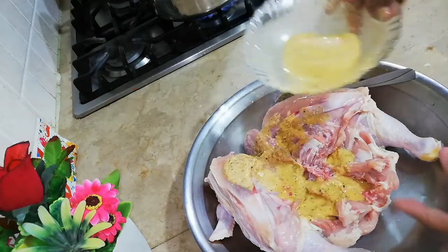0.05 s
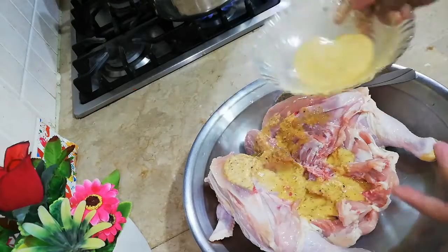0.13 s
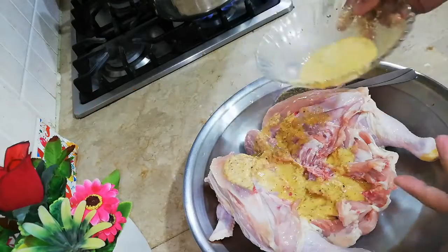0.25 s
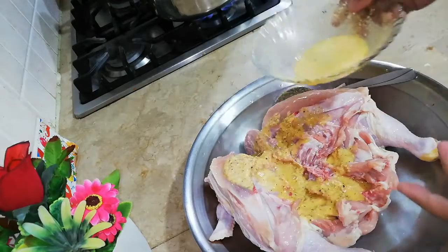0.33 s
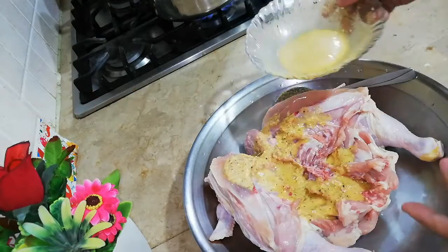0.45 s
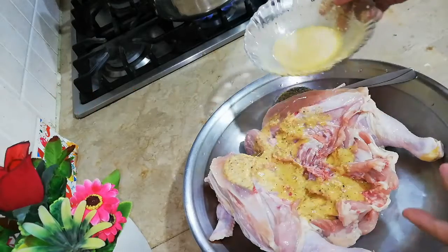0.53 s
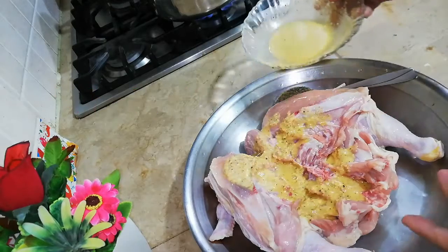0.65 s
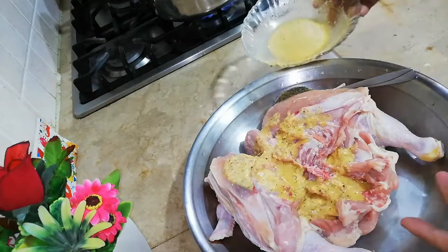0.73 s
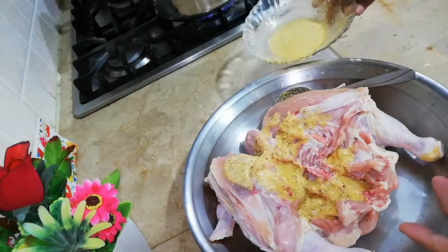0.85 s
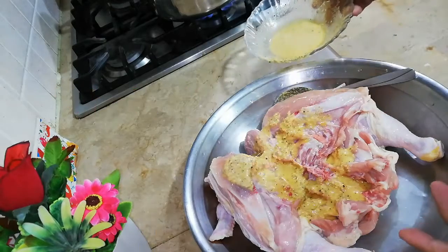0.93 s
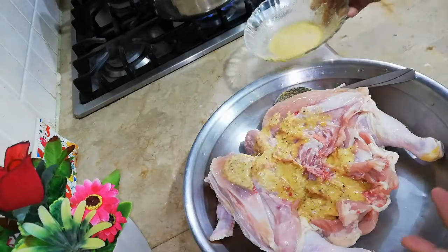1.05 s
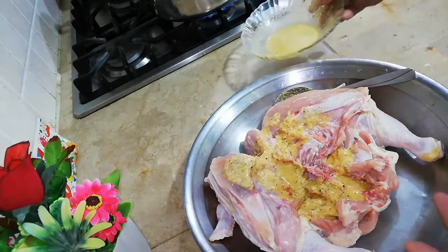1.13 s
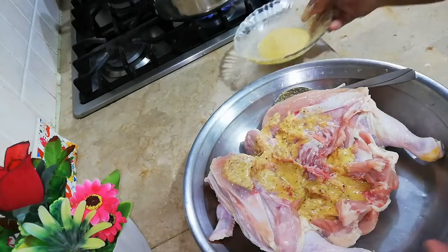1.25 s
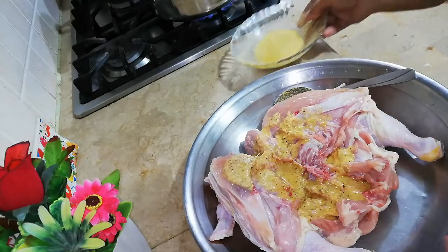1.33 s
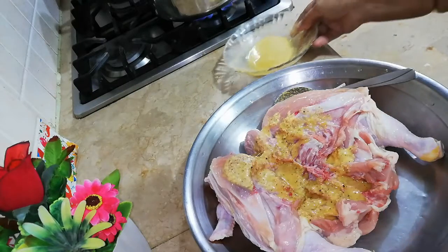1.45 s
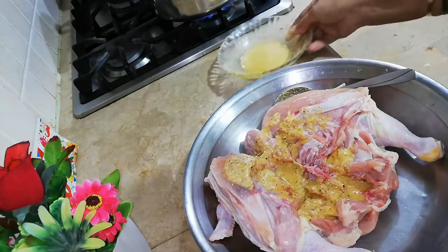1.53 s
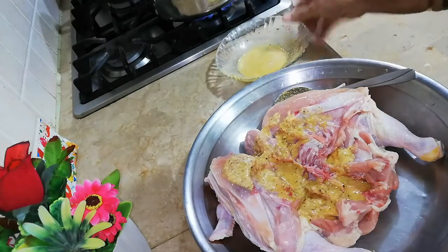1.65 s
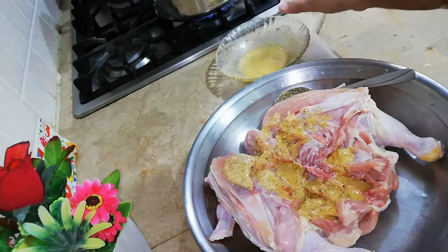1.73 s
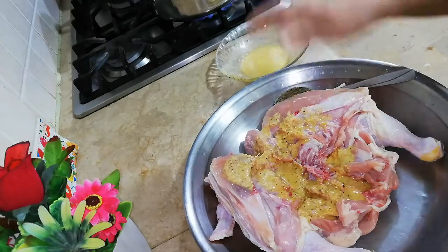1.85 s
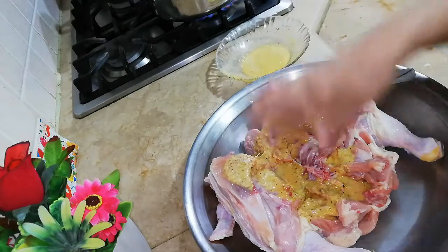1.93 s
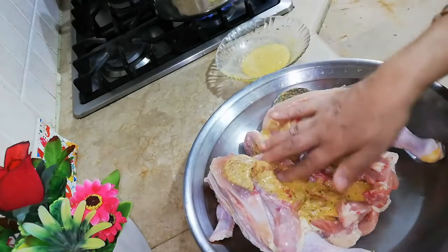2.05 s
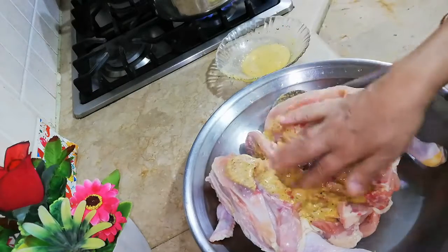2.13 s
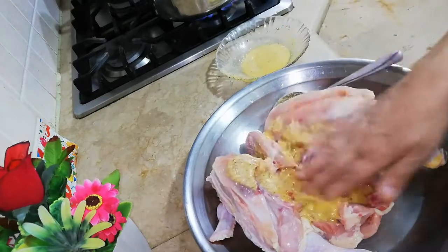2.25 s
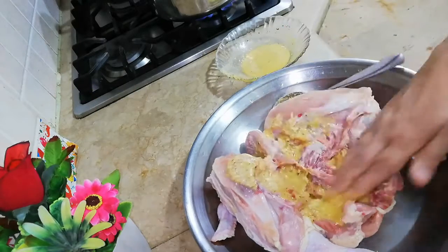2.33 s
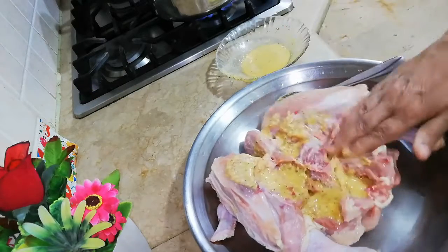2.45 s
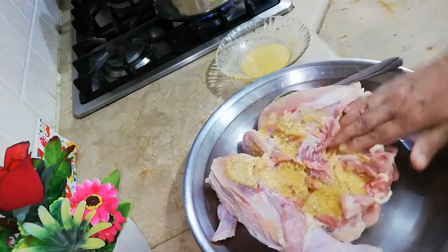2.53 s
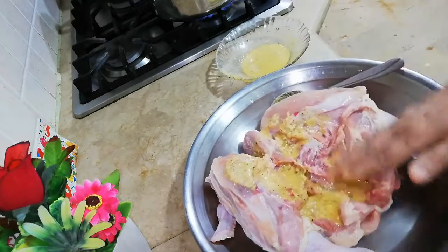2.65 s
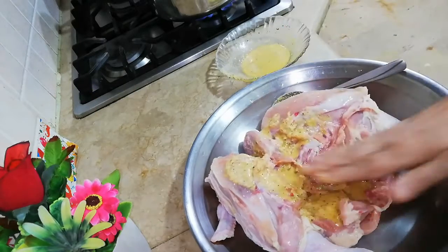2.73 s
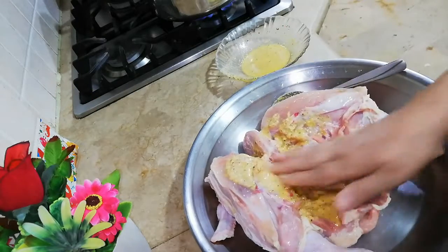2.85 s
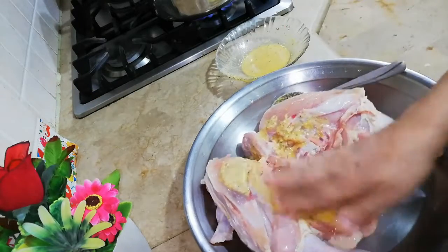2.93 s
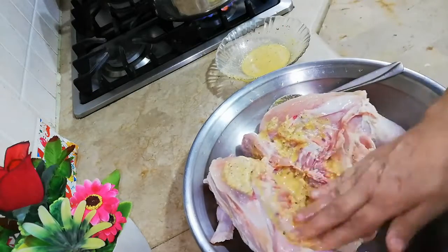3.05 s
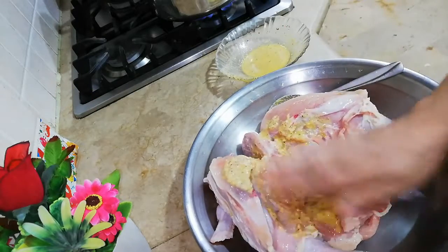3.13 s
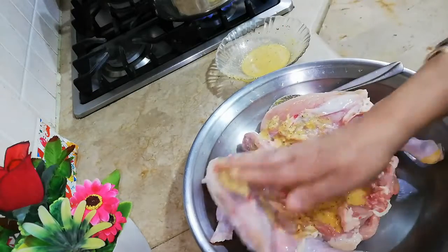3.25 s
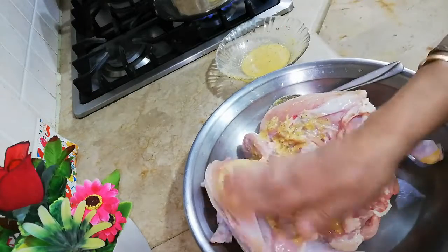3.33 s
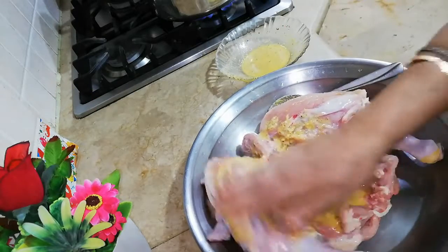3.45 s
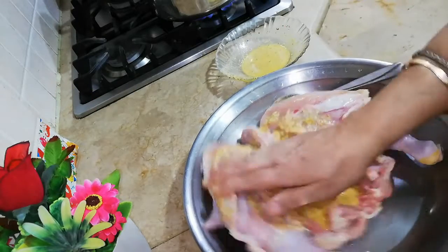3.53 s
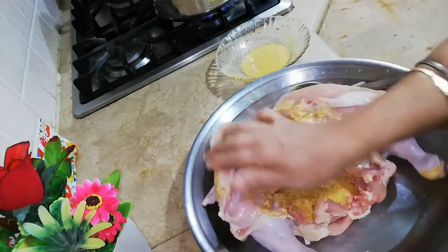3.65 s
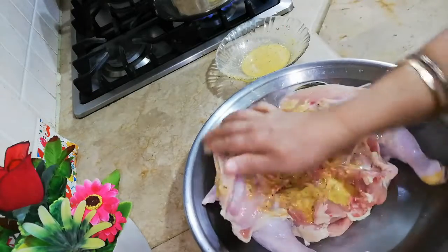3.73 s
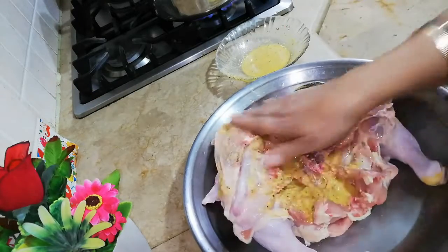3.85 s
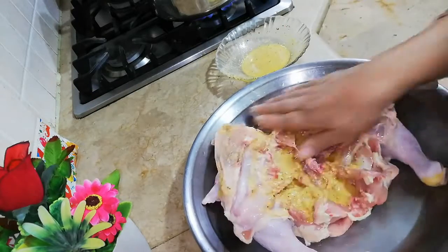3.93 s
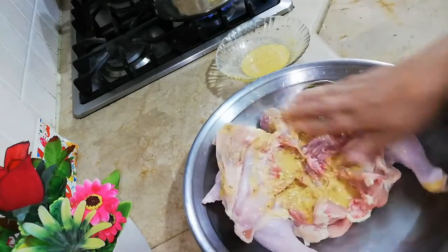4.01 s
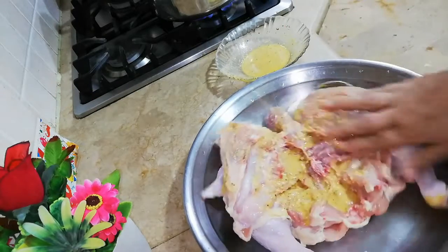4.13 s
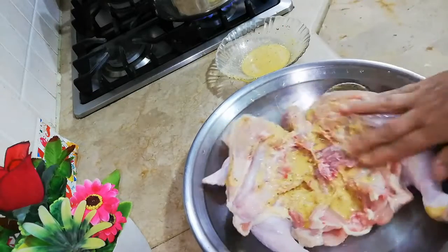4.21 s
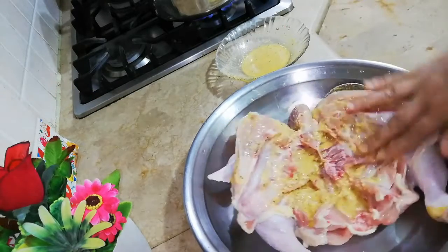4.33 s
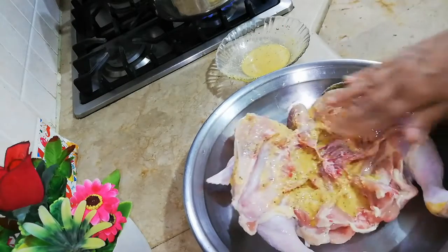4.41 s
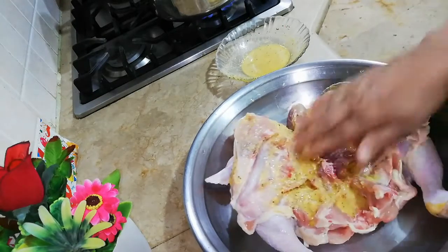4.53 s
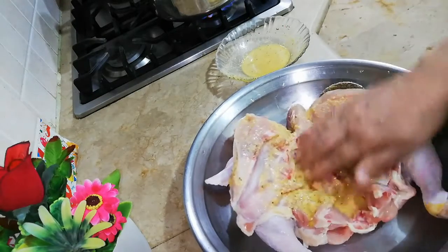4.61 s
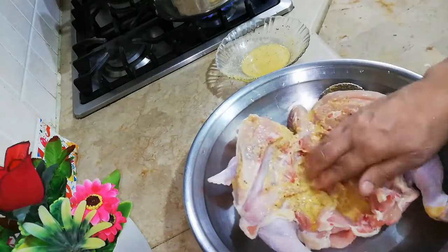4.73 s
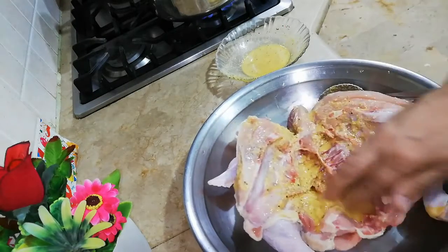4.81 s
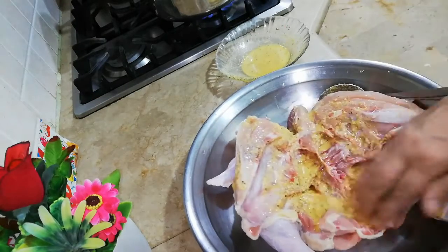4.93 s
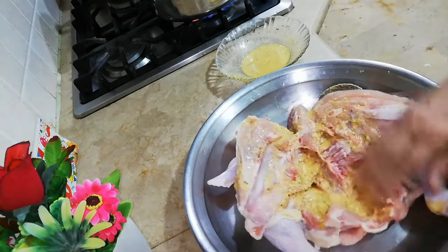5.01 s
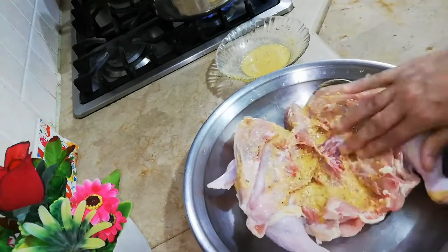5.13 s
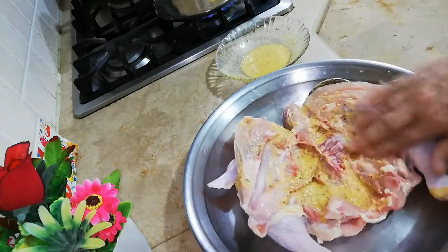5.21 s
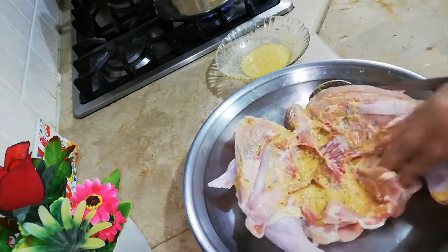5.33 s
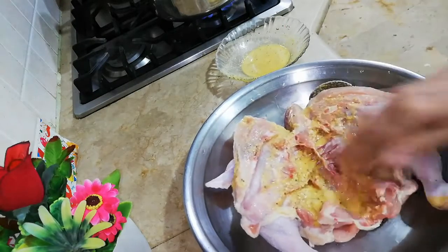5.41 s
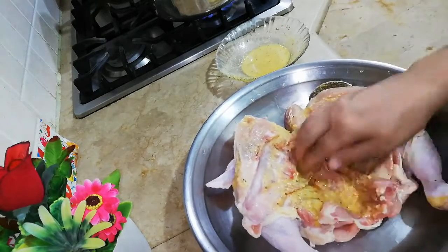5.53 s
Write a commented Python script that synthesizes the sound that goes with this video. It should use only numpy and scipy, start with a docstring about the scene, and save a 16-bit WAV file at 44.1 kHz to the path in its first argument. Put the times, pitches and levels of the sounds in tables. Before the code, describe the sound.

Over a low motor hum, a glass bowl is set down, then raw chicken is rubbed with wet smacks in a scraping metal tray.

```python
"""A small tiled kitchen with a humming motor. A glass bowl rocks down onto the stone counter in three
main knocks. A hand lands on raw chicken in a steel tray, which tips and clacks on the stone. As marinade
is rubbed in, the tray scrapes round in short strokes: tiny slips ring its floor, wall and rim, and the
hand bends the floor's pitch. Wet films smack, bubbles burst and air squelches out of the meat."""
import sys
import numpy as np
from scipy import signal
from scipy.fft import rfft, irfft, next_fast_len
from scipy.io import wavfile
from scipy.ndimage import uniform_filter1d

SR = 44100
rng = np.random.default_rng(int(sys.argv[2]) if len(sys.argv) > 2 else 0)


def unload_audio(sound):
    """Save the sound as a 16-bit wav file, at the path given as the first command line argument."""
    columns = np.transpose(np.atleast_2d(sound))
    # keep every value between -1 and 1, then stretch to whole-number steps
    steps = np.round(np.clip(columns, -1, 1) * 32767)
    wavfile.write(sys.argv[1], SR, steps.astype(np.int16))


N = 245637
TIME_S = np.arange(N) / SR
GRID_HZ = np.maximum(np.fft.rfftfreq(16384, 1 / SR), 1)

# Diffuse room sound. Each row: frequency in Hz, left-right correlation.
STEREO_CORRELATION = [(60, 0.96), (140, 1), (290, 0.63), (640, -0.57), (1400, 0.3), (3000, 0)]
# Room decay. Each row: frequency in Hz, T60 in seconds.
ROOM_T60 = [(100, 0.53), (400, 0.75), (1400, 0.53), (4000, 0.45), (12000, 0.32)]
# Motor and mains hum. Each row: frequency in Hz, rms level in dB.
HUM_TONES = [(48.5, -53.5), (97, -63.5), (100.5, -59), (145.4, -64), (290.7, -69)]
# Room noise spectrum. Each row: frequency in Hz, relative density in dB.
HISS_SPECTRUM = [(25, -6.5), (60, -0.5), (110, 1), (180, -1), (240, -9.5), (310, -4.5), (450, -11.5),
                 (850, -13), (1350, -15), (2000, -14.5), (5500, -20.5), (11200, -19.5), (12300, -30.5),
                 (16000, -28.5)]
# Faint whines in the room noise. Each row: frequency in Hz, width in Hz, relative level in dB.
WHINES = [(854, 115, 2.5), (1051, 34, 5), (1972, 64, 4.5), (2900, 480, -13), (3800, 105, 1.5),
          (7100, 68, -0.5), (11040, 220, -8.5)]

# Modes of the bowl on stone, its upper glass range, the counter and the steel tray.
# Each row: frequency in Hz, width in Hz, relative level in dB.
BOWL_MODES = [(797, 114, -6.5), (1217, 120, -3), (1520, 190, -7), (1770, 83, -8.5), (1950, 120, -9),
              (2350, 120, -11), (2660, 120, -13.5), (2760, 220, -17.5)]
GLASS_MODES = [(3210, 240, 9), (4380, 540, 0), (5220, 580, 2.5), (7900, 600, -7.5), (8800, 180, -3),
               (9900, 480, 0), (12800, 4700, -13)]
COUNTER_MODES = [(102, 4.4, 5), (113.4, 5.5, 2), (167.8, 7.1, 9), (200.4, 14.4, 1.5), (293, 18, 1.5),
                 (309, 30, -1), (353.7, 14.5, 3), (572, 140, -4.5)]
TRAY_MODES = [(836, 90, -1.5), (1280, 42, 3.5), (1368, 27, 6.5), (1588, 59, 11.5), (1820, 49, 7),
              (1960, 160, -19), (2153, 27, 9.5), (2473, 68, 2.5), (3190, 29, 5.5), (3390, 64, 3),
              (3630, 62, 5.5), (3970, 29, 7.5), (4310, 45, 3), (4514, 71, 6.5), (4843, 95, 4.5),
              (5160, 49, 3), (6230, 160, -12.5), (6660, 44, -6), (7080, 39, -3), (7560, 43, -4),
              (8070, 160, -8.5), (8650, 140, -7.5), (9300, 64, -7), (9870, 150, -17.5), (10910, 46, -8.5),
              (11500, 270, -16.5), (12300, 110, -16), (13800, 1800, -29.5)]
# Bowl knocks. Each row: start in seconds, delay until the foot seats in seconds, level in dB,
# clink offset in dB, clink emphasis in Hz, thud offset in dB.
KNOCKS = [(1.459, 0.001684, -5, -8.5, 5500, -16.5), (1.53, .0008, -8.5, -9.5, 4970, -16),
          (1.5486, 0.00138, -18, -21, 5000, -36), (1.6246, 0.00138, -8, -5, 8200, -15.5),
          (1.77, 0.00166, -27.5, -38, 5400, -48)]

# Meat under the palm. Each row: peak time in seconds, level in dB, pitch in Hz, half-length in seconds.
SQUELCHES = [(2.536, -49, 1130, 0.047), (2.705, -59, 520, 0.036), (3.637, -53, 490, 0.035),
             (4.106, -44, 860, 0.027), (4.39, -62, 610, 0.12), (5.52, -53.5, 720, 0.06),
             (5.537, -53, 573, 0.071)]
# Wet smacks. Each row: start in seconds, level in dB, centre in Hz, width in Hz.
SMACKS = [(2.055, -25, 10300, 3960), (2.07, -28, 7000, 4000), (2.0797, -21, 8800, 4000),
          (2.197, -29, 4480, 1500), (2.633, -28.5, 2900, 495), (2.9993, -17.5, 5200, 3450),
          (3.291, -27.5, 7850, 6000), (3.536, -35.5, 2200, 500), (3.5517, -21, 4540, 1500),
          (3.572, -27, 1270, 500), (4.577, -28, 7550, 4000), (4.6462, -27, 4780, 1500),
          (4.789, -27, 4940, 3540), (4.8415, -27.5, 10800, 5000), (5.12, -11.5, 10100, 1200),
          (5.345, -22, 3380, 800)]

# Tray hits on the counter. Each row: start in seconds, level in dB.
CLACKS = [(2.2208, -14), (2.2226, -6.5), (2.2257, -9), (2.2294, -13), (2.252, -24)]
# Mode weighting for a hard blow at the tray's edge. Each row: frequency in Hz, gain in dB.
EDGE_BLOW_EQ = [(400, 6.5), (870, -11.5), (1400, -7), (1900, -15), (2450, -4.5), (2800, -13), (3160, 5.5),
                (3750, -6.5), (4300, 5.5), (4700, -10), (5400, 2), (8000, 6), (15000, 4.5)]
# Hand pushes on the tray. Each row: start, rise and hold in seconds, level in dB,
# rim offset in dB, floor offset in dB.
PUSHES = [(1.927, .02, .08, -59, -4, -4), (2.273, .12, .025, -42, -6.5, -5),
          (2.45, 0.025, .02, -57, -4, -10), (2.499, 0.029, .02, -43, -4.5, -1.5),
          (2.564, 0.021, .01, -48, -4, -.5), (2.636, .045, .04, -41, -8, -1.5),
          (2.95, 0.056, .006, -41.5, -1.5, -6.5), (3.034, 0.035, .006, -41, -3, -4.5),
          (3.379, 0.029, 0.013, -49, -6, -2), (3.554, 0.084, .03, -35.5, 4, -5.5),
          (3.667, 0.027, 0.067, -40.5, 2.5, -2.5), (3.962, 0.046, .14, -42, -4.5, -3.5),
          (4.116, 0.023, 0.057, -38.5, -1, -3), (4.195, 0.022, 0.063, -43, -2, -1.5),
          (4.273, 0.023, .02, -36.5, -1.5, -3), (4.305, 0.022, .006, -35.5, 4, -5),
          (4.362, 0.013, .045, -35.5, -1, -2), (4.423, 0.018, 0.064, -51.5, -6, 2),
          (4.648, .025, 0.027, -55.5, -6, 3.5), (5.031, 0.085, .012, -39, -3.5, -3.5),
          (5.133, 0.032, 0.096, -45, -2.5, 1.5), (5.232, .025, 0.018, -40.5, -3.5, -2.5),
          (5.342, 0.021, .105, -40.5, -7.5, -2)]
# Upper floor mode, bent by the hand. Each row: time in seconds, frequency in Hz.
FLOOR_BEND = [(2.3, 1630), (2.42, 1830), (2.55, 1613), (2.7, 1840), (3.62, 1900), (4.02, 1820),
              (4.28, 1810), (4.38, 1527), (5.1, 1650), (5.22, 1530), (5.45, 1500)]


def amp(db):
    """Decibels to gain."""
    return 10 ** (np.asarray(db) / 20)


def unit_rms(x):
    """Scale to rms 1."""
    return x / np.sqrt(np.mean(x ** 2))


def contour(points, hz):
    """Interpolate (Hz, value) points on a log-frequency axis."""
    points_hz, values = np.transpose(points)
    return np.interp(np.log(hz), np.log(points_hz), values)


def resonances(modes):
    """Gain of overlapping modes, summed in power."""
    return np.sqrt(sum(amp(db) ** 2 / (1 + ((GRID_HZ ** 2 - hz ** 2) / (GRID_HZ * width_hz)) ** 2)
                       for hz, width_hz, db in modes))


def band(low_hz, high_hz, order=6):
    """Band-pass gain."""
    return 1 / np.sqrt((1 + (low_hz / GRID_HZ) ** (2 * order)) * (1 + (GRID_HZ / high_hz) ** (2 * order)))


def response(gain):
    """Minimum-phase impulse response of a gain curve, peak 1."""
    cepstrum = irfft(np.log(gain + 1e-6 * gain.max()))
    half = len(cepstrum) // 2
    cepstrum[1:half] *= 2
    cepstrum[half + 1:] = 0
    impulse = irfft(np.exp(rfft(cepstrum)))[:half]
    return impulse / np.abs(impulse).max()


def convolve(x, impulse):
    """Convolve per channel, up to N samples."""
    return signal.fftconvolve(np.atleast_2d(x), np.atleast_2d(impulse), axes=1)[:, :N]


def add(out, start_s, sound):
    """Mix a sound in at start_s."""
    i = int(start_s * SR)
    out[:, i:i + sound.shape[-1]] += sound[..., :N - i]


def drift(rate_hz):
    """Smooth random drift, rms 1."""
    step = int(SR / rate_hz)
    stairs = np.repeat(rng.standard_normal(N // step + 1), step)
    return unit_rms(uniform_filter1d(stairs, step)[:N])


def grit(rate_per_s, spread_db):
    """Random stereo impulses: many small, a few large."""
    hits = rng.random(N) < rate_per_s / SR
    sizes = amp(spread_db * np.minimum(rng.exponential(size=N), 4))
    return hits * sizes * rng.standard_normal((2, N))


def flutter(decay_s):
    """Dense waves crossing a thin wall; energy 1 per channel."""
    t = TIME_S[:SR // 10]
    waves = rng.standard_normal((2, len(t))) * amp(-60 * t / decay_s)
    for _ in range(3):  # flatten the spectrum, keep the smear in time
        flat = irfft(np.exp(1j * np.angle(rfft(waves))), len(t))
        waves = flat * amp(-20 * t / decay_s)
    return waves / np.sqrt(np.sum(waves ** 2, axis=1, keepdims=True))


def diffuse_noise(size):
    """Noise from all sides: channels alike in the bass, unrelated in the treble."""
    mid, side = rfft(rng.standard_normal((2, size)))
    correlation = np.clip(contour(STEREO_CORRELATION, np.fft.rfftfreq(size, 1 / SR) + 1), -1, 1)
    mid *= np.sqrt((1 + correlation) / 2)
    side *= np.sqrt((1 - correlation) / 2)
    return irfft(np.array([mid + side, mid - side]), size)


def room(x, wet_db, gap_s=0.001):
    """Add kitchen reverberation; the treble dies first."""
    t = TIME_S[:SR * 3 // 4]
    spectrum = rfft(diffuse_noise(len(t)))
    hz = np.fft.rfftfreq(len(t), 1 / SR) + 1
    tail = 0
    for centre_hz, t60_s in ROOM_T60:
        share = contour([(f, float(f == centre_hz)) for f, _ in ROOM_T60], hz)
        tail += irfft(spectrum * share, len(t)) * amp(-60 * t / t60_s)
    tail *= t > gap_s
    return x + amp(wet_db) * convolve(x, tail / np.sqrt(np.sum(tail ** 2) / 2))


def background(waver_rad=0.053, hiss_db=-53, whine_db=-61.5):
    """Slightly unsteady motor and mains hum over room hiss and faint whines."""
    hum = 0
    for hz, db in HUM_TONES:
        phase = 2 * np.pi * (hz * TIME_S + rng.random()) + waver_rad * drift(rate_hz=17)
        hum += np.sqrt(2) * amp(db) * np.sin(phase)
    hiss = unit_rms(convolve(diffuse_noise(N), response(amp(contour(HISS_SPECTRUM, GRID_HZ)))))
    whine = unit_rms(convolve(diffuse_noise(N), response(resonances(WHINES))))
    return hum + amp(hiss_db) * hiss + amp(whine_db) * whine


def squelches(width_hz=200):
    """Air squeezed from pockets in the meat gives short hollow sounds."""
    out = 0
    for peak_s, db, hz, half_s in SQUELCHES:
        crackle = grit(rate_per_s=760, spread_db=2)
        pocket = response(resonances([(hz, width_hz, 0)]) ** 2)
        swell = np.exp(-2 * ((TIME_S - peak_s) / half_s) ** 2)
        out += amp(db) * swell * unit_rms(convolve(crackle, pocket))
    return out


def bubbles(effort, count=900, t60_cycles=22, spread_db=4.5):
    """Tiny bubbles burst in the marinade, louder as the hand rubs harder."""
    out, t = np.zeros((2, N)), TIME_S[:SR // 40]
    for when, pitch, rank, pan in rng.random((count, 4)):
        hz = 2700 * 3.8 ** pitch
        phase = 2 * np.pi * hz * t * (1 + 4 * t)  # pitch lifts as the bubble surfaces
        ring = np.sin(phase) * amp(-60 * t * hz / t60_cycles)
        gain = effort[int(when * N)] * amp(1.5 - spread_db * np.log(rank + 0.033))
        add(out, when * N / SR, gain * np.sqrt([[pan], [1 - pan]]) * ring)
    return room(out, wet_db=1.5)


def smacks():
    """Films of marinade snap between fingers and skin."""
    out = np.zeros((2, N))
    for start_s, db, hz, width_hz in SMACKS:
        pop = response(resonances([(hz, width_hz, 0)]) * band(1100, 11800, order=2))
        add(out, start_s, amp(db) * convolve(pop, flutter(decay_s=0.029)))
    return room(out, wet_db=-5)


def bowl_knocks(touch_db=-7, left_lag_s=0.0001, emphasis_db=6):
    """The bowl's foot touches, then seats; the glass clinks and the counter thuds."""
    body, clink, thud = np.zeros((3, 2, N))
    knock = response(resonances(BOWL_MODES) * band(845, 2840, order=4))
    slab = response(resonances(COUNTER_MODES) * band(94, 540, order=3))
    for start_s, seat_s, db, clink_db, clink_hz, thud_db in KNOCKS:
        add(body, start_s, amp(db + touch_db) * knock)
        add(body, start_s + seat_s, amp(db) * knock)
        # each point of the foot favours other glass modes
        emphasis = 2.5 + resonances([(clink_hz, 700, emphasis_db)])
        glass = response(resonances(GLASS_MODES) * band(2600, 16600) * emphasis)
        add(clink, start_s, amp(db + clink_db) * convolve(glass, flutter(decay_s=0.044)))
        add(thud, start_s, amp(db + thud_db) * slab)
    body[0] = np.roll(body[0], int(left_lag_s * SR))  # bowl stands to the right
    return room(body, wet_db=-1.5) + room(clink, wet_db=-3) + room(thud, wet_db=-3.5)


def tray_clacks(min_width_hz=85, pan_db=0.7):
    """The landing hand tips the tray and damps its sharpest modes; the base chatters on the stone."""
    out = np.zeros((2, N))
    damped = [(hz, max(width_hz, min_width_hz), db) for hz, width_hz, db in TRAY_MODES]
    steel = response(resonances(damped) * amp(contour(EDGE_BLOW_EQ, GRID_HZ)))
    for start_s, db in CLACKS:
        add(out, start_s, amp(db) * convolve(steel, flutter(decay_s=0.023)))
    return room(out * amp([[-pan_db], [pan_db]]), wet_db=-3.5)


def hand_pushes(sag_db_per_s=17.5, release_db_per_s=309):
    """Floor, wall and rim gains: each push rises, tires a little, then the tray slides to rest."""
    drive = np.zeros((3, N))
    for start_s, rise_s, hold_s, db, rim_db, floor_db in PUSHES:
        active = (TIME_S > start_s) & (TIME_S < start_s + 0.5)
        t = TIME_S[active] - start_s
        rise = np.sin(np.pi / 2 * np.minimum(t / rise_s, 1)) ** 2
        past_peak_s = np.maximum(t - rise_s, 0)
        released_s = np.maximum(past_peak_s - hold_s, 0)
        push = rise * amp(db - sag_db_per_s * past_peak_s - release_db_per_s * released_s)
        drive[:, active] = np.maximum(drive[:, active], push * amp([[floor_db], [0], [rim_db]]))
    return drive


def gliding_mode(slips, hz, width_hz):
    """A resonance with a moving centre, kept ringing by the slips."""
    carrier = np.exp(2j * np.pi * np.cumsum(hz) / SR)
    lowpass = signal.butter(2, width_hz / 2, fs=SR, output="sos")
    return unit_rms((signal.sosfilt(lowpass, slips / carrier) * carrier).real)


def bent_modes(slips, lower_rest_hz=1322, upper_rest_hz=1500, lower_share=0.23, balance_db_per_hz=0.08):
    """Hand pressure bends the floor: two modes rise in pitch and the balance shifts to the upper."""
    upper_hz = np.interp(TIME_S, *np.transpose(FLOOR_BEND))
    bend_hz = upper_hz - upper_rest_hz
    lower = gliding_mode(slips, lower_rest_hz + lower_share * bend_hz, width_hz=114)
    upper = gliding_mode(slips, upper_hz, width_hz=157)
    balance = amp(-7 + balance_db_per_hz * bend_hz)
    return (lower + balance * upper) / np.hypot(1, balance)


def floor_ring(slips, bent_db=-1.5, steady_db=-6, rub_db=-12):
    """Two floor modes bend; the others stay in tune over a dull rub."""
    weighting = amp(contour([(870, 10), (1400, 6), (1900, -6), (2300, 0.5)], GRID_HZ))
    steady = unit_rms(convolve(slips, response(resonances(TRAY_MODES) * band(726, 2780) * weighting)))
    rub = unit_rms(convolve(slips, response(band(344, 2400, order=3))))
    return amp(bent_db) * bent_modes(slips) + amp(steady_db) * steady + amp(rub_db) * rub


def wandering_ring(slips, low_hz, high_hz, swell_db, groups):
    """As the contact point travels, groups of steel modes swell and fade independently."""
    size = next_fast_len(N)
    spectrum = rfft(convolve(slips, response(resonances(TRAY_MODES) ** 0.96)), size)
    hz = np.fft.rfftfreq(size, 1 / SR)
    edges_hz = np.geomspace(low_hz, high_hz, groups + 1)
    out = 0
    for from_hz, to_hz in zip(edges_hz, edges_hz[1:]):
        share = np.interp(hz, GRID_HZ, band(from_hz, to_hz, order=14) ** 2)
        group = irfft(spectrum * share, size)[:, :N]
        out += group * amp(swell_db * drift(rate_hz=22))
    return unit_rms(out)


def tray_scrape(floor_gain, wall_gain, rim_gain, judder_db=0.5, floor_pan_db=0.6, rim_pan_db=1.0):
    """Each push drags the tray; tiny slips over the stone ring its floor, wall and rim."""
    slips = grit(rate_per_s=6000, spread_db=2) * amp(judder_db * drift(rate_hz=61))
    floor = floor_ring(slips) * amp([[floor_pan_db], [-floor_pan_db]])
    wall = wandering_ring(slips, low_hz=2900, high_hz=5400, swell_db=2.5, groups=3) * amp(1.5)
    rim = wandering_ring(slips, low_hz=5900, high_hz=16000, swell_db=0.7, groups=4)
    rim *= amp([[-rim_pan_db], [rim_pan_db]])
    return room(floor_gain * floor + wall_gain * wall + rim_gain * rim, wet_db=-12)


def scene():
    """Bowl, tray and wet sounds over the background; the same pushes drive scrape and bubbles."""
    floor_gain, wall_gain, rim_gain = hand_pushes()
    dishes = bowl_knocks() + tray_clacks() + tray_scrape(floor_gain, wall_gain, rim_gain)
    meat = bubbles(effort=wall_gain) + squelches() + smacks()
    return dishes + meat + background()


def record(dry, cutoff_hz=16100):
    """Steep low-pass on the top treble."""
    return signal.sosfilt(signal.ellip(10, 0.2, 70, cutoff_hz, fs=SR, output="sos"), dry)


dry = scene()
out = record(dry)
unload_audio(out)
```